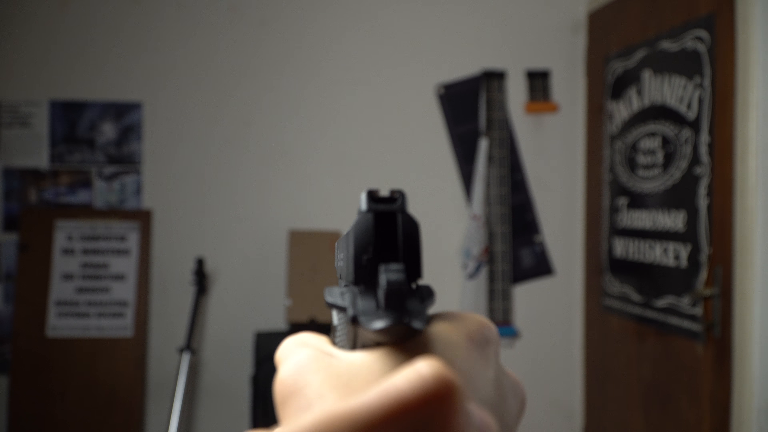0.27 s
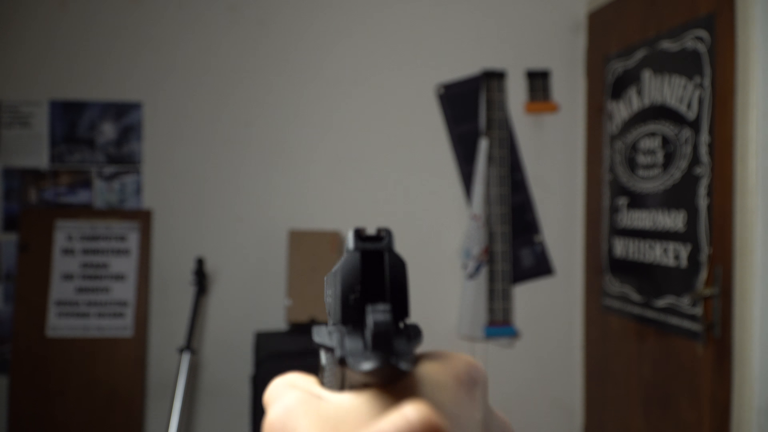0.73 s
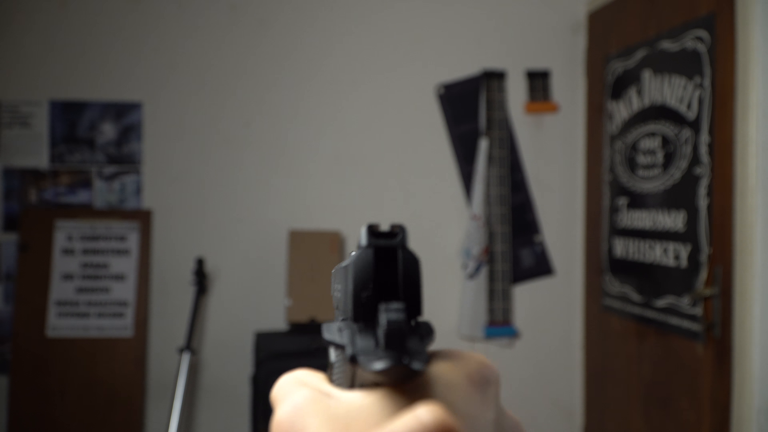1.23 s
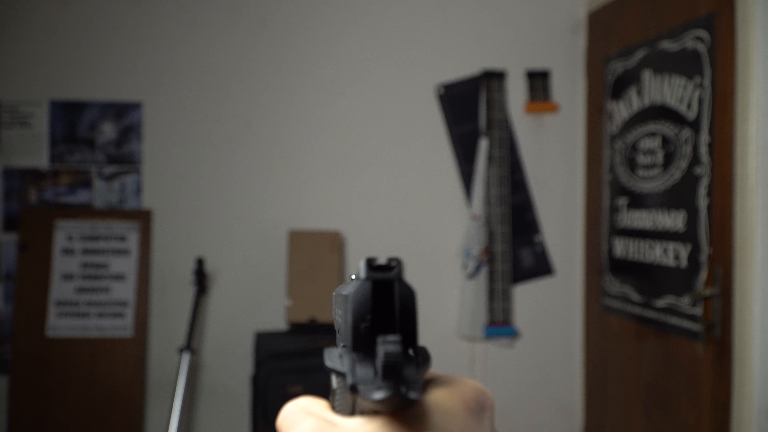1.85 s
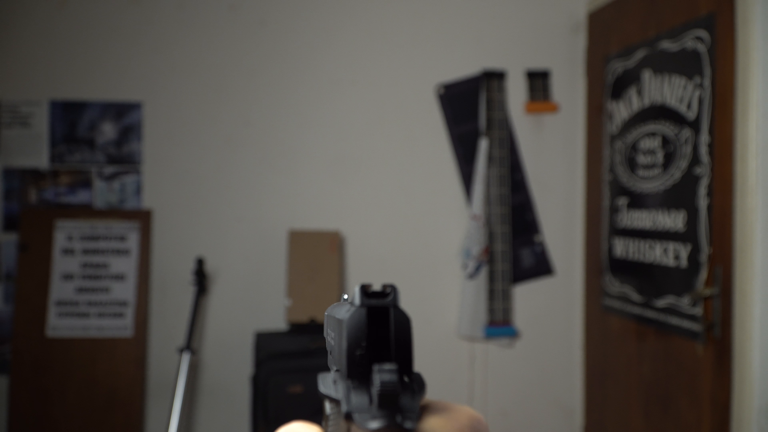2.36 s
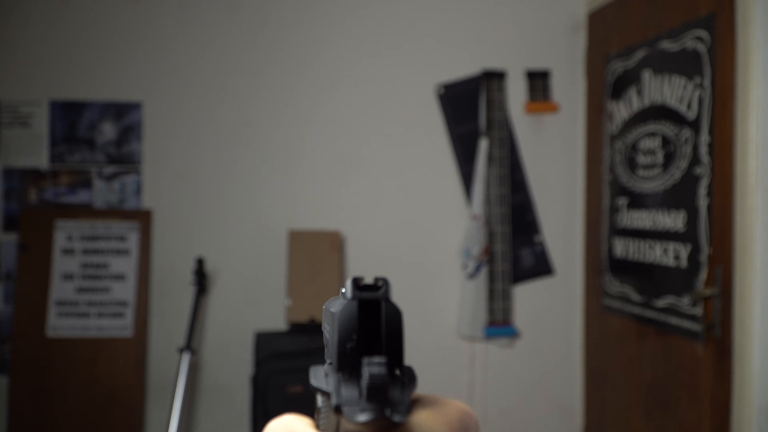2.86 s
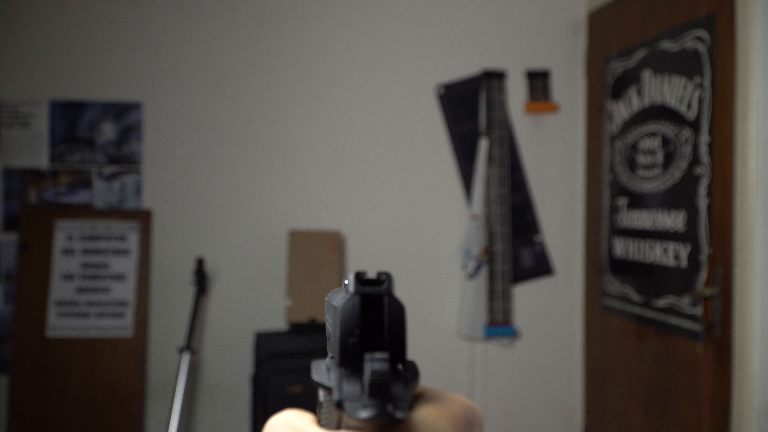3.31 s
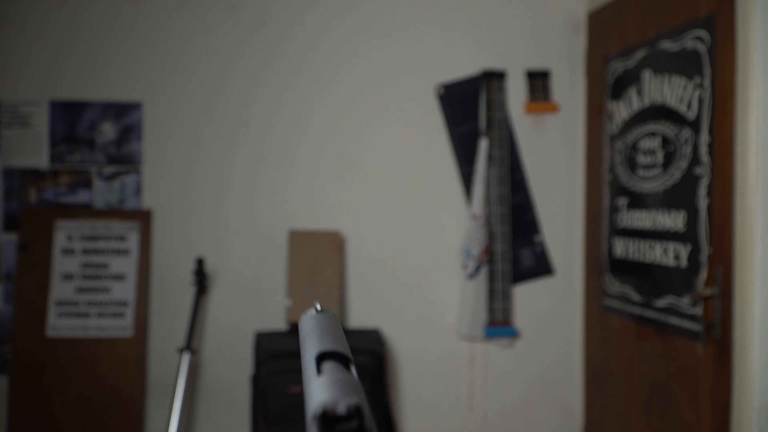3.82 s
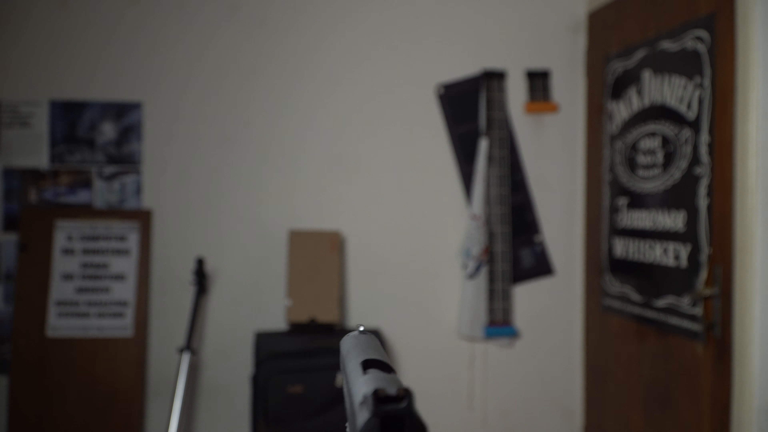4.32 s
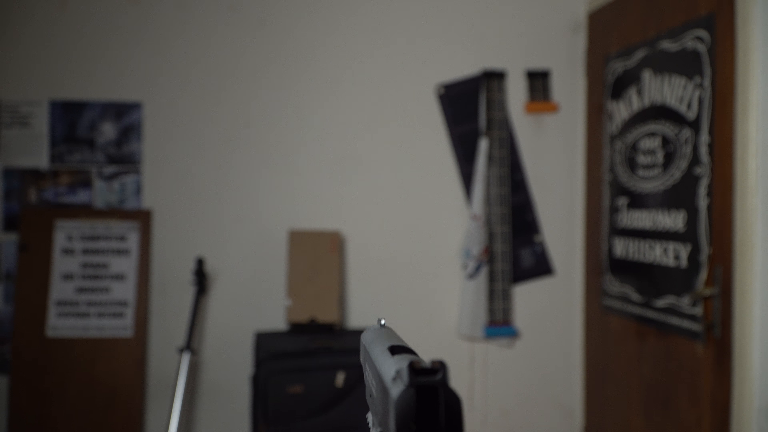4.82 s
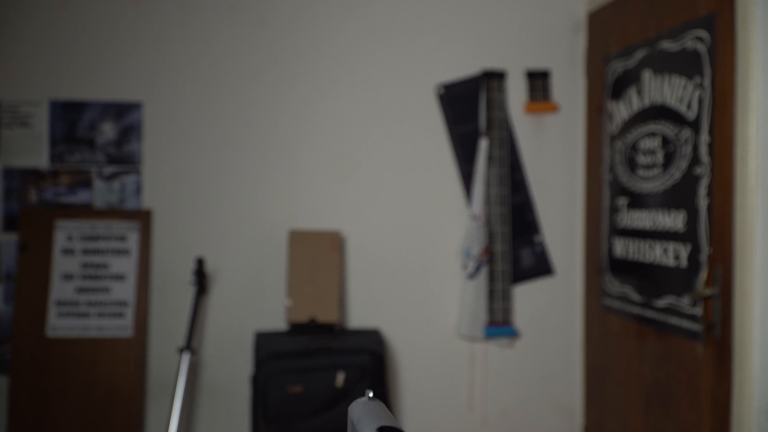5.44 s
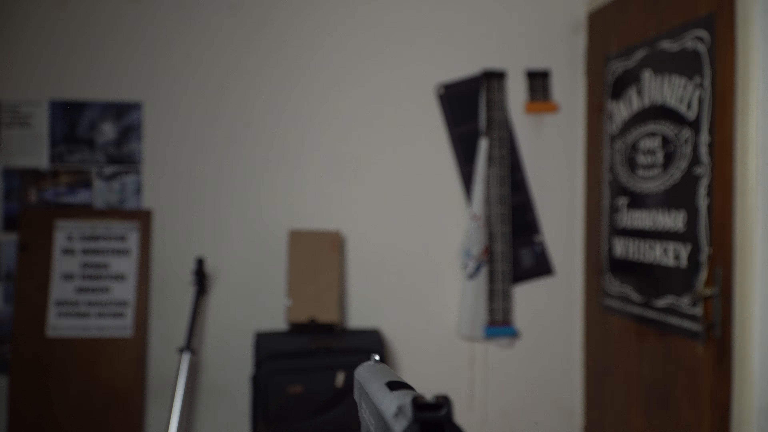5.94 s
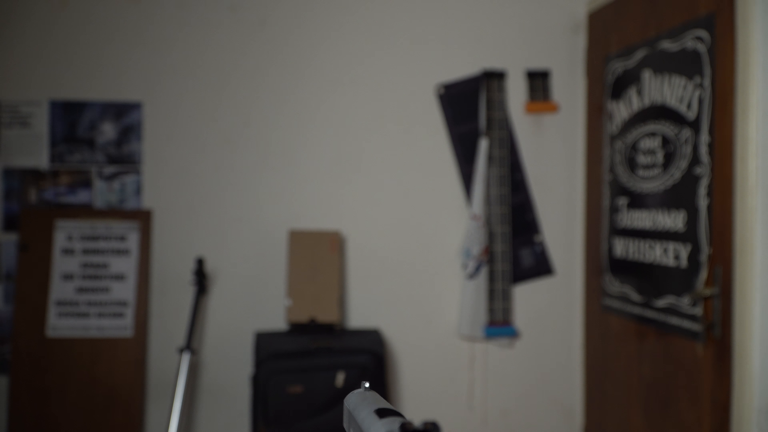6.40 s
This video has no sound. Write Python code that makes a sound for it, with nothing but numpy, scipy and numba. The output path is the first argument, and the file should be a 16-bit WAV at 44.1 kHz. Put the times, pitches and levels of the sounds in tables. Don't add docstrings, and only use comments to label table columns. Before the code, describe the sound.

A small bedroom is nearly silent, with low hand rumble, soft hush, a very faint motor whine and hiss. A sleeve brushes faintly at 0.7 s and the grip creaks just before 1.85 s, when a gas pellet pistol fires: hammer tick, distorted gas blast, then within about 50 ms a cardboard slap and ringing steel slide slam. The room roars flat, then dies in about half a second. A pellet hits the wall and hops ever faster to rest by 2.9 s. A tick at 3.08 precedes the second shot at 3.12, followed by hard pellet bounces and rolling from 3.65. Creaks and plastic snaps cluster around 3.8-4.05. At 4.65 a hand thumps the camera with a tiny falling squeak and brief roll. Metal clicks at 5.43 and 5.73 lead to the third shot at 5.83; pellets bounce, clatter and roll until about 6.7.

```python
import sys
import numpy as np
from scipy import signal
from scipy.fft import rfft, irfft, next_fast_len
from scipy.io import wavfile
from scipy.ndimage import uniform_filter1d, map_coordinates
from numba import njit

SR = 44100
rng = np.random.default_rng(int(sys.argv[2]) if len(sys.argv) > 2 else 0)


def how_loud(loudness_db):
    steps = np.asarray(loudness_db, float) / 20
    return 10 ** steps


def digitize_waveform(pressure):
    field = np.atleast_2d(pressure).T
    bounded = np.clip(field, -1, 1)
    quanta = np.round(bounded * 32767).astype(np.int16)
    wavfile.write(sys.argv[1], SR, quanta)


N = 294110

# frequency in Hz, density in dB per Hz.
SHAKE_SPECTRUM = [(3, -30), (8, -4), (15, 0), (21, -8), (27, -22), (45, -34), (80, -120)]
HUSH_SPECTRUM = [(88, -29), (150, -3.5), (400, -7), (757, -9.5), (1600, -10.5), (2300, -20), (7410, -30.5),
                 (15800, -34)]
DRONE_SPECTRUM = [(24, -30.5), (41, -2), (76, -8.5), (204, -25), (313, -27), (450, -28.5), (580, -65.5),
                  (990, -120)]
# time in seconds, level in dB.
TREMOR = [(0.0, -33), (1.69, -32), (1.93, -39), (2.12, -27), (2.77, -42), (3.29, -33.5), (3.34, -31.5),
          (3.94, -41.5), (4.23, -30.5), (4.98, -34.5), (5.79, -30), (5.92, -59), (6.18, -27.5),
          (6.67, -30.5)]
# frequency in Hz, level in dB rms.
FAN = [(1447, -70), (1650, -73)]

# frequency in Hz, decay time t60 in seconds.
ROOM_T60 = [(100, .6), (300, .62), (800, .62), (2000, .52), (5000, .47), (10000, .42), (15000, .4)]
# frequency in Hz, level in dB.
ROOM_COLOUR = [(60, -29.5), (150, -8.5), (400, 13), (1000, 6.5), (3000, 6), (6000, 2.5), (9000, -7),
               (15000, -21)]

# start in seconds, level in dB, centre in Hz, width in Hz, t60 in seconds.
SLEEVE = (.729, -55, 3700, 3500, .16)
# time in seconds, peak in dB.
CREAKS = [
    (1.7747, -41.5),
    (3.7778, -31),
    (3.8444, -31),
    (3.9916, -44),
    (4.6671, -45),
]
TICKS = [
    (3.0828, -27),
    (5.433, -27.5),
    (5.7271, -29.5),
]
SNAPS = [
    (3.8178, -33.5),
    (3.902, -49),
    (4.03, -31.5),
    (4.0495, -32.5),
    (5.4464, -43.5),
]
PINGS = [
    (4.574, -48.5),
    (5.3855, -43),
]
CLACK = [
    (4.6448, -17),
]

# start in seconds, pellet flight in seconds, slide return in seconds.
SHOTS = [
    (1.8503, .0368, .0492),
    (3.1213, .0372, .0490),
    (5.8292, .0380, .0517),
]
CHARGE = [8.8, 8.7, 7.74]
STAGE_DELAYS = [-.0048, -.0025, 0, .0016, .0030, .0105, .0155, .0200]
# level in dB, centre in Hz, width in Hz, t60 in seconds.
CYCLE = [
    (-42.5, 3000, 1400, .08),
    (-23, 15000, 4400, 0.0029),
    (-13.5, 4500, 7100, 0.021),
    (-3, 12000, 7000, 0.016),
    (6, 650, 5300, 0.037),
    (-3, 3720, 1000, 0.11),
    (-0.5, 12000, 12000, 0.073),
    (4.5, 3400, 2400, 0.019),
]
# frequency in Hz, width in Hz, level in dB.
CARD_MODES = [(320, 110, -1), (630, 490, -1), (790, 260, 8), (1140, 210, 13), (2355, 4100, 5.5)]
SLIDE_MODES = [(3010, 150, -8), (4400, 70, 2), (6120, 60, 5), (7800, 150, -9), (9300, 90, -1),
               (11250, 150, -4), (12500, 200, -10), (14200, 200, -13)]
PANEL_HZ = [312, 400, 553, 694, 792, 853, 1120, 1281]
# t60 in seconds, then level in dB after each of the three shots.
PANELS = [(0.4, -51, -48, -23.5), (1.3, -45.5, -45, -46), (1.38, -51.5, -49.5, -53),
          (1.4, -55.5, -43.5, -74), (1.3, -51.5, -45.5, -58.5), (1.63, -49.5, -47.5, -50.5),
          (0.81, -45.5, -52.5, -39), (1.6, -65, -51, -45)]

# time in seconds, peak in dB.
ON_WALL = [
    (2.0534, -7),
    (3.2987, 0),
    (6.0174, 5),
    (6.6664, -35.5),
]
ON_FURNITURE = [
    (2.0673, -15.5),
    (6.3389, -36.5),
    (6.3859, -25),
    (6.4285, -22.5),
    (6.4914, -37),
    (6.6547, -47),
]
ON_BOARDS = [
    (2.31, -28),
    (3.3799, 2),
    (3.4044, -17),
    (3.493, -11),
    (6.074, -9.5),
    (6.2297, -13),
]
HOPS = [
    2.1919,
    2.4023,
    2.5497,
    2.6641,
    2.7453,
    2.808,
    2.8574,
]

# start, rise and hold in seconds, level of the
# boards in dB, level of the grit in dB.
ROLL = [
    (3.648, 0.35, 0.6, -48.5, -52.5),
    (4.626, 0.03, .03, -49, -58),
    (6.18, 0.04, .45, -48.5, -47),
]
# frequency in Hz, density in dB per Hz.
BOARDS_SPECTRUM = [(41, -41), (70, -9.5), (346, -7.5), (599, -17.5), (912, -14), (1600, -24.5), (2600, -47),
                   (4400, -120)]
GRIT_SPECTRUM = [(880, -23), (1730, 5), (4500, 2), (4940, -3), (5700, 1), (7500, -18), (9750, -54),
                 (16500, -120)]
FINE_SPECTRUM = [(4120, -28), (7000, -4), (8550, -4), (11700, 4), (15500, -19)]

# time in seconds, level in dB, frequency in Hz, signed direction.
BUMPS = [
    (4.6457, -12.5, 290, -1.37),
    (4.6483, -10.5, 430, 0.52),
    (4.666, -17.5, 151, -1.07),
    (6.478, -24, 150, 1),
]

# its own pitch in Hz, treble edge in dB, broad body in dB.
BOARD_HIT, WALL_HIT, FURNITURE_HIT = (5800, -10, -2), (8000, 0, -6), (4200, -16, -2)
METAL_TICK, GRIP_CREAK, GRIP_SNAP = (6100, -7, 2.5), (3650, -22, -.6), (5650, -17, .5)
SPRING_PING, SHELL_CLACK = (8800, -6, -8), (2800, -30, -9)

LEAD_S = .01


def unit(x):
    return x / np.sqrt(np.mean(x ** 2) + 1e-20)


def along(points, hz):
    f, v = np.transpose(points)
    return np.interp(np.log(hz + 1), np.log(f + 1), v)


def filtered(x, response):
    m = next_fast_len(len(x) + 8192)
    return irfft(rfft(x, m) * response(np.fft.rfftfreq(m, 1 / SR)), m)[:len(x)]


def resonances(modes):
    def response(f):
        total = 0
        for k, (centre, width, db) in enumerate(modes):
            damping = 1j * f * width
            total = total + (-1) ** k * how_loud(db) * damping / (centre * centre - f * f + damping)
        return total
    return response


def noise(spectrum):
    return unit(filtered(rng.standard_normal(N), lambda hz: how_loud(along(spectrum, hz))))


def wobble(size, rate):
    knots = rng.standard_normal(int(size * rate / SR) + 4)
    return map_coordinates(knots, [np.arange(size) * rate / SR])


def add(x, s, part):
    at = x[round(s * SR):][:len(part)]
    at += part[:len(at)]


def push(hz):
    u = 2 * np.pi * hz * np.arange(SR // 10) / SR
    return u * (1 - .4 * u) * np.exp(-u)


def room(response, seconds):
    mode_spacing_hz, build_up_s = 21.94, 0.0037
    uneven = lambda f: how_loud(3 * wobble(len(f), SR * f[1] / mode_spacing_hz))
    air = filtered(rng.standard_normal(int(SR * seconds)), uneven)
    hz, t, z = signal.stft(air, SR, nperseg=256)
    patches = uniform_filter1d(rng.standard_normal(z.shape), size=5, axis=0)
    patches = unit(uniform_filter1d(patches, size=3, axis=1))
    colour = how_loud(along(ROOM_COLOUR, hz)) * np.abs(response(hz))
    decay = how_loud(2 * patches - 60 * t / along(ROOM_T60, hz)[:, None])
    tail = signal.istft(z * colour[:, None] * decay, SR, nperseg=256)[1]
    return unit(tail * (1 - np.exp(-np.arange(len(tail)) / SR / build_up_s)))


def burst(db, modes, t60, wet_db, order=1, air_db=-60, tail=.75):
    colour = lambda f: resonances(modes)(f) ** order
    scattered = lambda f: np.abs(colour(f)) + how_loud(air_db) * np.abs(resonances([(11000, 6000, 0)])(f))
    x = how_loud(wet_db - 17) * np.sqrt(t60 / .02) * room(scattered, tail)
    t = np.arange(SR // 8) / SR
    direct = unit(filtered(rng.standard_normal(len(t)), colour))
    add(x, 0, direct * how_loud(-60 * t / t60) * (1 - np.exp(-t / (0.016 * t60))))
    return how_loud(db) * x


def clicks(table, colour, t60, wet_db, air_db, dulls_db=0):
    x, t = np.zeros(N), np.arange(SR // 40) / SR
    hz, treble_db, body_db = colour
    for k, (s, db) in enumerate(table):
        edge_db = treble_db - dulls_db * k
        modes = [(650, 700, -6), (2400, 3000, body_db), (hz, .4 * hz, 0), (11000, 8000, edge_db)]
        add(x, s - .001, burst(db - 10.5, modes, t60, wet_db, order=2, air_db=air_db, tail=.45))
        ring = np.sin(2 * np.pi * hz * rng.uniform(.95, 1.05) * t)
        add(x, s - .001, how_loud(db - 14 - 60 * t / .011) * ring)
    return x


def background():
    t = np.arange(N) / SR
    whine = np.zeros(N)
    for hz, db in FAN:
        phase_drift = np.cumsum(rng.standard_normal(N)) * 0.011
        whine += np.sqrt(2) * how_loud(db) * np.sin(2 * np.pi * hz * t + phase_drift)
    walls = how_loud(-57 - 0.5 * wobble(N, 1.3))
    for s, *_ in SHOTS:
        walls += (t > s) * how_loud(-48 - 60 * np.abs(t - s) / 0.3)
    tremor_s, tremor_db = np.transpose(TREMOR)
    tremor = how_loud(np.interp(t, tremor_s, tremor_db)) * noise(SHAKE_SPECTRUM)
    return tremor + walls * noise(DRONE_SPECTRUM) + how_loud(-57.5) * noise(HUSH_SPECTRUM) + whine


def sleeve():
    x = np.zeros(N)
    s, db, hz, width_hz, t60 = SLEEVE
    add(x, s, burst(db, [(hz, width_hz, 0)], t60, wet_db=-6.5, order=2))
    return x


def handling():
    x = clicks(CREAKS, GRIP_CREAK, t60=.03, wet_db=-15, air_db=-26)
    x += clicks(TICKS, METAL_TICK, t60=0.023, wet_db=-17.5, air_db=-14)
    x += clicks(SNAPS, GRIP_SNAP, t60=0.047, wet_db=-11, air_db=-14)
    x += clicks(PINGS, SPRING_PING, t60=.015, wet_db=-15, air_db=-12)
    return x + clicks(CLACK, SHELL_CLACK, t60=0.023, wet_db=-13, air_db=-32)


def gas_cycle():
    x = np.zeros(SR * 3 // 2)
    for delay, (db, hz, width_hz, t60) in zip(STAGE_DELAYS, CYCLE):
        add(x, LEAD_S + delay, burst(db, [(hz, width_hz, 0)], t60, wet_db=-11.5))
    add(x, LEAD_S + STAGE_DELAYS[4], -how_loud(-1.0) * push(140) - how_loud(-12.5) * push(40))
    return x


def barrel_whoop():
    t = np.arange(SR) / SR
    hz = 900 + 6000 * (1 - np.exp(-t / .0022))
    return how_loud(6.0) * np.sin(2 * np.pi * np.cumsum(hz) / SR) * np.exp(-(t / .0034) ** 4)


def target_hit():
    x = burst(0.57, CARD_MODES, 0.035, wet_db=-5.5)
    for echo_s, db in [(0, 6), (.0022, 5), (.0031, 3), (.0095, 3)]:
        add(x, echo_s, how_loud(db) * push(2200))
    return x


def slide_slam():
    x = np.zeros(SR)
    for rebound_s, db in [(0, 0.27), (.0075, -2.4)]:
        add(x, rebound_s, burst(db, SLIDE_MODES, .045, wet_db=-14))
    add(x, 0, burst(-6, [(10000, 5000, 0)], .012, wet_db=-12))
    return x


def panel_ring(panels):
    t = np.arange(SR) / SR
    x = np.zeros(SR)
    for hz, t60, db in panels:
        shimmer = how_loud(3.5 * wobble(len(t), 24))
        x += how_loud(db + 6.5 - 60 * t / t60) * shimmer * np.sin(2 * np.pi * hz * t)
    return x * (1 - np.exp(-t / .02))


def shot(flight, slide_back, panels):
    x = gas_cycle()
    add(x, LEAD_S + STAGE_DELAYS[4], barrel_whoop())
    add(x, LEAD_S + flight, target_hit())
    add(x, LEAD_S + slide_back, slide_slam())
    add(x, LEAD_S + flight, panel_ring(panels))
    return x


def pistol():
    x = np.zeros(N)
    for k, (s, flight, slide_back) in enumerate(SHOTS):
        panels = [(hz, t60, db[k]) for hz, (t60, *db) in zip(PANEL_HZ, PANELS)]
        add(x, s - LEAD_S, how_loud(CHARGE[k]) * shot(flight, slide_back, panels))
    return x


def pellets():
    hops = [(s, -6 * k) for k, s in enumerate(HOPS)]
    x = clicks(ON_WALL, WALL_HIT, t60=.012, wet_db=-12, air_db=-6)
    x += clicks(ON_FURNITURE, FURNITURE_HIT, t60=0.039, wet_db=-4.5, air_db=-13)
    x += clicks(hops, BOARD_HIT, t60=0.021, wet_db=-8.5, air_db=0.5, dulls_db=-1)
    return x + clicks(ON_BOARDS, BOARD_HIT, t60=0.022, wet_db=-8, air_db=4.5)


def rolling():
    x, t = np.zeros(N), np.arange(N) / SR
    stop_s, fade_db_per_s = 0.23, 9
    for s, rise, hold, boards_db, grit_db in ROLL:
        corners = np.cumsum([s, abs(rise), abs(hold), stop_s])
        on = np.interp(t, corners, [0, 1, 1, 0]) ** 2
        rattle = how_loud(1.9 * wobble(N, 30) + 1.3 * wobble(N, 250) - fade_db_per_s * np.clip(t - s, 0, 1))
        fine_db = -15 + .7 * (grit_db - ROLL[-1][-1])
        grit = rattle * how_loud(grit_db) * (noise(GRIT_SPECTRUM) + how_loud(fine_db) * noise(FINE_SPECTRUM))
        rumble = noise(BOARDS_SPECTRUM) + how_loud(-6.5) * noise(DRONE_SPECTRUM)
        x += on * (how_loud(boards_db + 2 * wobble(N, 33)) * rumble + grit)
    return x


def bumps():
    slip_s, slip_length_s, start_hz, end_hz = 4.682, .072, 5950, 3250
    u = (np.arange(N) / SR - slip_s) / slip_length_s
    progress = np.clip(u, 0, 1)
    hz = start_hz + (end_hz - start_hz) * progress ** 2.4
    breaks_db = 5.5 * np.cos(2 * np.pi * 2.6 * (u - 1))
    level_db = -65 + 9 * progress + breaks_db
    phase = 2 * np.pi * np.cumsum(hz * (1 + .035 * wobble(N, 600))) / SR
    x = how_loud(level_db + 3 * wobble(N, 300)) * np.sin(phase)
    x *= np.clip(np.minimum(u, 1.2 - u) * 10, 0, 1)
    for s, db, push_hz, direction in BUMPS:
        add(x, s, direction * how_loud(db + 7.5) * push(push_hz))
    return x


def scene():
    x = background() + sleeve() + handling() + pistol() + pellets() + rolling() + bumps()
    return np.array([x, x])


@njit
def follower(level, attack, release):
    out, held = np.empty_like(level), 0.0
    for i in range(len(level)):
        held += (attack if level[i] > held else release) * (level[i] - held)
        out[i] = held
    return out


def low_pass(x):
    return signal.sosfilt(signal.butter(12, 15990, fs=SR, output="sos"), x)


def record(dry):
    held = follower(np.abs(dry[0]), 1 / (0.0098 * SR), 1 / (0.014 * SR))
    x = dry[0] / (1 + (held / how_loud(-13.0)) ** 5) ** (1 / 5)
    x = x / (1 + np.abs(x / .97) ** 5) ** (1 / 5)
    x = filtered(x, lambda hz: how_loud(along([(15000, 0), (16500, -14)], hz)))
    hiss = [noise([(2000, -42.0), (5000, -7), (9000, 3.5), (16000, -2)]) for _ in dry]
    return low_pass(x + how_loud(-78) * np.array(hiss))


dry = scene()
out = record(dry)
digitize_waveform(out)
```